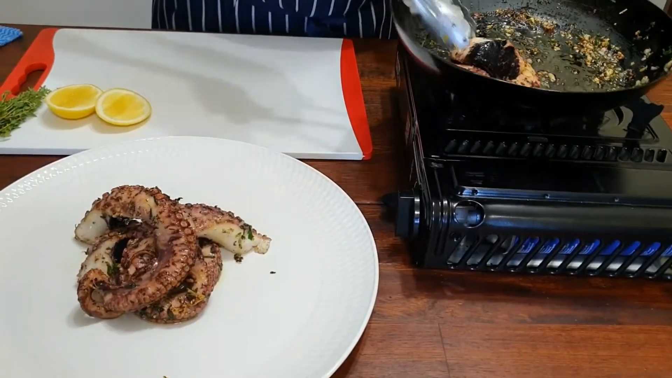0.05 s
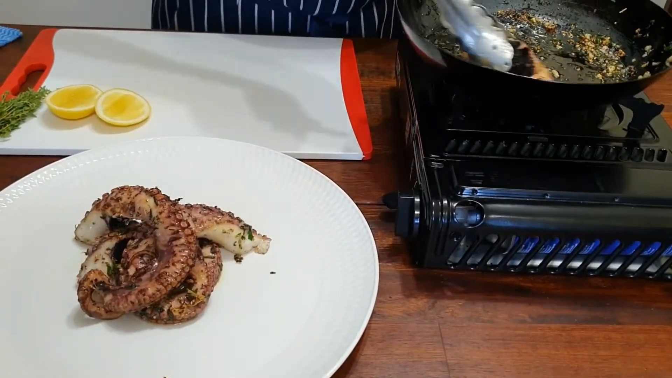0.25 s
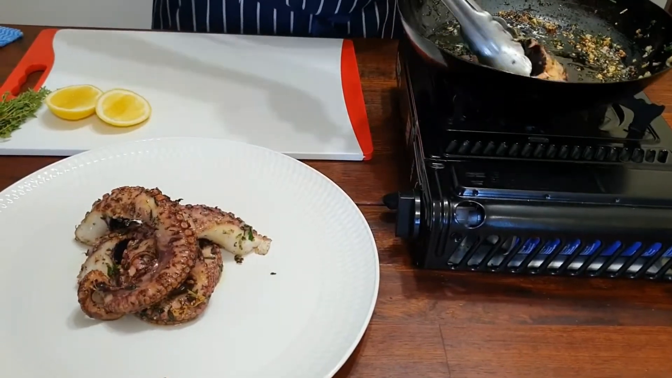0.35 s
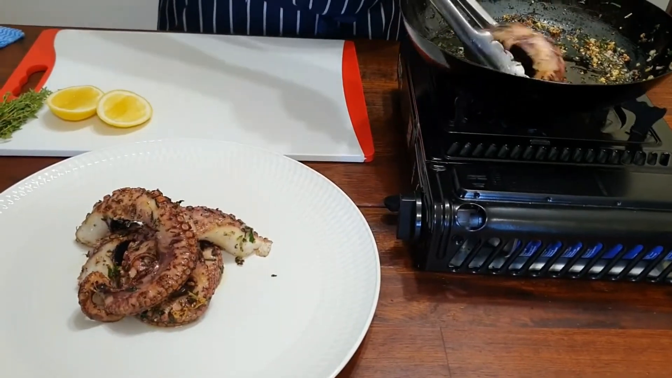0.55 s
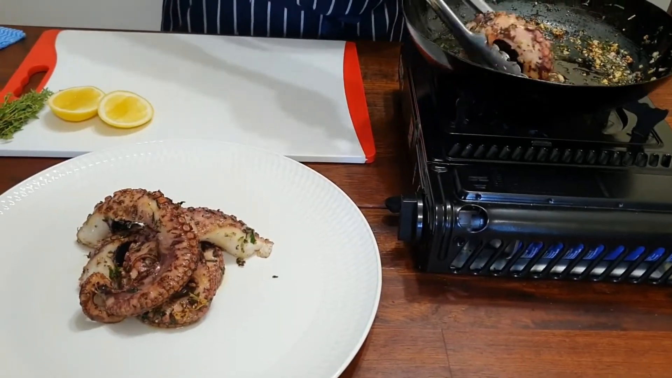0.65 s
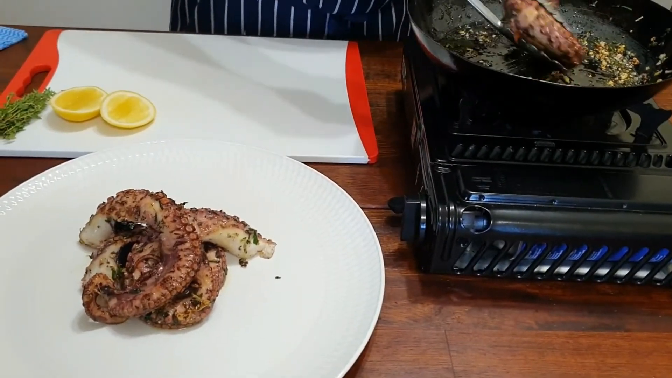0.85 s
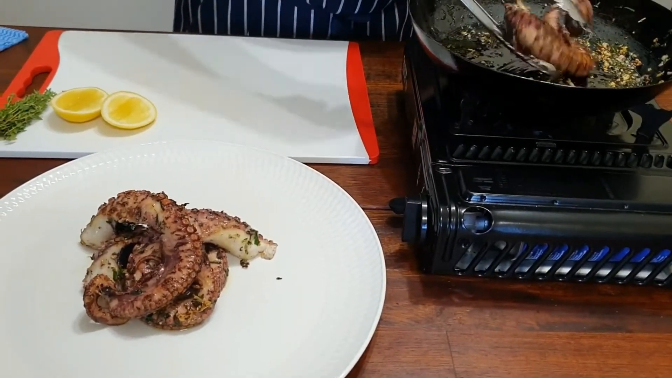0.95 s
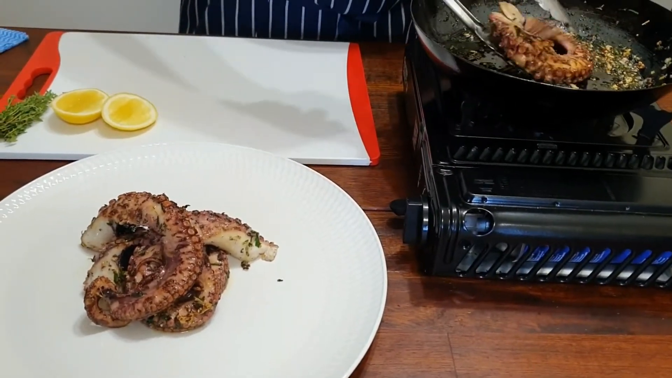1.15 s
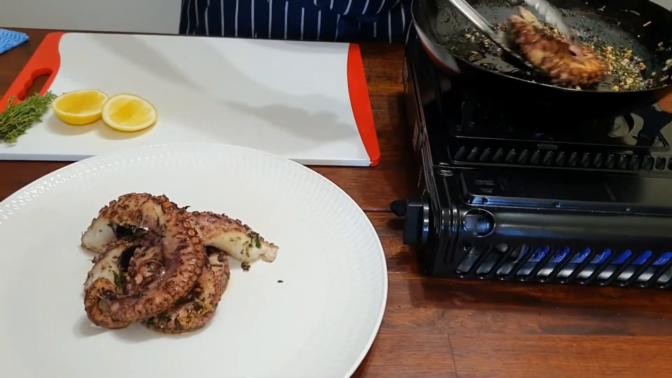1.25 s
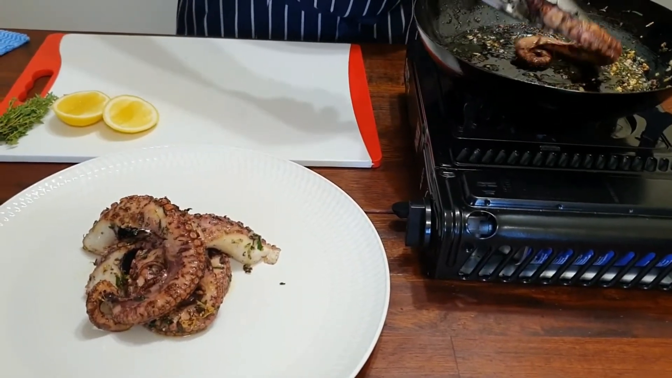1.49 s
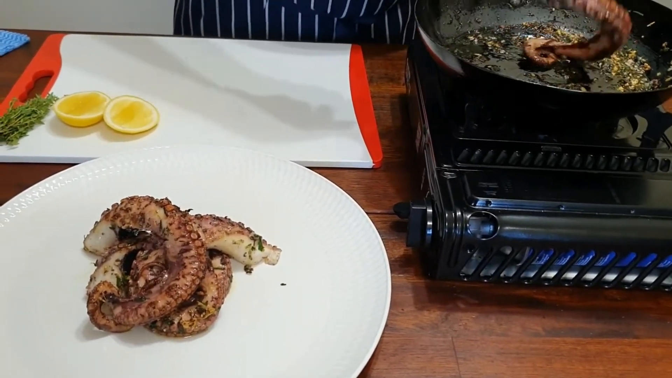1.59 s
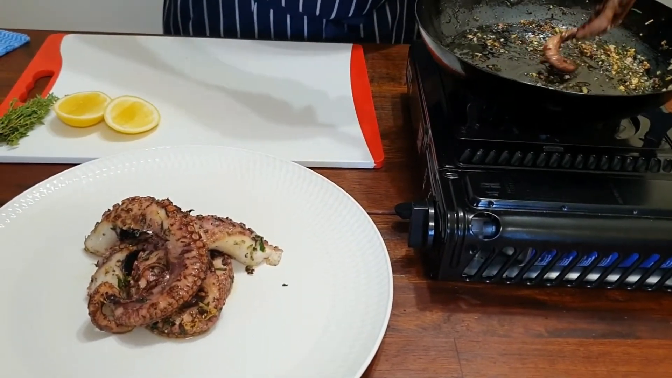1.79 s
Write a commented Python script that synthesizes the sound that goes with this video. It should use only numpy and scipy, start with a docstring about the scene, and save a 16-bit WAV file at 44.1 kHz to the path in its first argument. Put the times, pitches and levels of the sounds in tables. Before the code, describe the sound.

Metal tongs strike a steel frying pan with a loud, quick double clank and low thump, then a gritty scrape and a few light taps, close to the camera in a small hard kitchen with faint hum.

```python
"""Metal tongs strike and slide in a steel frying pan in a small hard kitchen, near a camera.
Over quiet room noise with a low wavering hum, a loud double clank comes at 0.22 and 0.25 s with a low thump;
a gritty slide and a few light touches follow. The pan's lowest tone swells and sinks beneath them.
Strikes are dying modes plus coloured noise, the slide random clicks, the low tones sines, the room shaped noise."""
import sys
import numpy as np
from scipy import signal
from scipy.fft import rfft, irfft
from scipy.io import wavfile
from scipy.ndimage import uniform_filter1d

SR = 44100
rng = np.random.default_rng(int(sys.argv[2]) if len(sys.argv) > 2 else 0)


def invert_db(level):
    """Linear amplitude ratio for a level in decibels (20 dB per decade), elementwise."""
    return 10 ** (np.asarray(level, dtype=float) / 20)


def to_wav(sig):
    """Store sig (one row per channel, or 1-D mono) as 16-bit WAV at the path in sys.argv[1].

    Samples outside -1..1 are clipped; the rate is SR.
    """
    pcm = np.clip(np.atleast_2d(sig), -1, 1) * 32767
    pcm = np.round(pcm).astype(np.int16)
    wavfile.write(sys.argv[1], SR, pcm.T)  # frames by channels


N = 79380

# Modes of the pan. Each row: frequency in Hz, relative level in dB, t60 in seconds (the slide shortens it).
PAN_MODES = [(290, -17, .1), (538, -4, .5), (615, -10, .6), (672, -9, .3), (820, -5, .45), (935, -4, .3),
             (1012, 0, .6), (1140, -7, .45), (1180, -7, .5), (1224, -6, .5), (1290, -6, .4), (1402, -6, .4),
             (1530, -5, .3), (1690, -7, .3), (1770, -5, .3), (1990, -9, .25), (2286, -4, .3),
             (2490, -6, .3), (2570, -10, .3), (2832, -7, .3), (3280, -10, .25)]
MONO_HZ = 400  # well below this both ports hear the same


def evened(x):
    """Scales to rms 1."""
    return x / np.sqrt(np.mean(x ** 2) + 1e-20)


def read(points, hz):
    """Reads a table on a log-frequency axis."""
    f, value = np.transpose(points)
    return np.interp(np.log(hz + 1), np.log(f + 1), value)


def hump_db(hz, centre_hz, octaves):
    """A bell on the octave axis, 6 dB down at the given octaves (at least 0.08) to either side."""
    return -6 * (np.log2((hz + 1) / centre_hz) / max(octaves, .08)) ** 2


def coloured(x, db):
    """Filters by a dB value for each FFT bin."""
    return irfft(rfft(x) * invert_db(db), x.shape[-1])


def add(mix, s, sound):
    """Mixes a sound in at s seconds, which may lie before zero."""
    at = round(s * SR)
    sound = sound[:, max(-at, 0):]
    part = mix[:, max(at, 0):][:, :sound.shape[1]]
    part += sound[:, :part.shape[1]]


def air():
    """Quiet room noise with its low wavering hum, from random short-time spectra."""
    # Each row: frequency in Hz, relative level in dB per Hz.
    spectrum = [(12, -42), (20, -14.5), (102, 0), (178, -28), (210, -13.5), (539, -17.5), (637, -17),
                (773, -20.5), (840, -17), (5840, -33), (12000, -48.5), (15000, -44)]
    # Each row: frequency in Hz, left-right likeness from -1 to 1.
    likeness = [(60, 0.89), (180, 1), (540, 0.21), (1620, 0.02), (4840, -0.27), (14500, 0.3)]
    level_db, patchy_db = -56.5, 1.2
    frames, hz = N // 512 + 5, np.fft.rfftfreq(2048, 1 / SR)
    a, b, c, d, patches = rng.standard_normal((frames, 1025, 5)).T
    patches = uniform_filter1d(patches, 20, 0)
    patches = evened(uniform_filter1d(patches, 6, 1))
    same = np.clip(read(likeness, hz), -1, 1)[:, None]
    left = a + 1j * b
    right = same * left + np.sqrt(1 - same ** 2) * (c + 1j * d)
    z = np.array([left, right]) * invert_db(read(spectrum, hz)[:, None] + patchy_db * patches)
    noise = signal.istft(z, nperseg=2048, noverlap=1536)[1][:, :N]
    return invert_db(level_db) * evened(noise)


def kitchen(x):
    """Sparse taps of random sign, each band dying at its own speed; the bass is alike at both ports."""
    # Each row: frequency in Hz, t60 in seconds.
    decay = [(100, 0.58), (400, 0.51), (1200, 0.25), (3500, 0.37), (8000, 0.4), (14000, 0.13)]
    taps = np.zeros((2, SR))
    at = np.arange(200, SR - 20, 20) + rng.integers(0, 20, (2, (SR - 201) // 20))
    np.put_along_axis(taps, at, rng.choice([-1., 1.], at.shape), 1)
    hz, t, z = signal.stft(taps, SR, nperseg=512)
    apart = (hz ** 2 / (hz ** 2 + MONO_HZ ** 2))[:, None]
    right = np.sqrt(1 - apart ** 2) * z[0] + apart * z[1]
    t60_s = np.maximum(read(decay, hz), .05)[:, None]
    z = np.array([z[0], right]) * invert_db(-60 * t / t60_s)
    tail = signal.istft(z, SR, nperseg=512)[1]
    tail = tail / np.linalg.norm(tail, axis=1, keepdims=True)
    return signal.fftconvolve(x[None], tail, axes=1)


def drone():
    """The pan's lowest tone, a sine that swells and sinks, slightly unsteady in pitch."""
    # Each row: time in seconds, level in dB before the trim.
    swell = [(0.0, -55), (0.124, -77), (0.175, -68.5), (0.236, -33), (0.28, -27), (0.35, -46),
             (0.409, -34.5), (0.437, -49.5), (0.466, -37), (0.506, -55), (0.52, -49.5), (0.579, -70),
             (0.666, -40.5), (0.69, -43), (0.746, -64), (0.832, -60), (0.886, -78), (0.99, -72),
             (1.02, -53.5), (1.06, -56.5), (1.108, -51.5), (1.178, -61.5), (1.308, -73), (1.382, -52.5),
             (1.554, -84), (1.654, -69), (1.8, -74)]
    pitch_hz, waver_rms_hz, trim_db = 383.7, 6.79, -4.5
    s, db = np.transpose(swell)
    waver = uniform_filter1d(rng.standard_normal(N), 1500)
    waver = evened(uniform_filter1d(waver, 1500))
    turns = np.cumsum(pitch_hz + waver_rms_hz * waver) / SR
    rms_db = np.interp(np.arange(N) / SR, s, db) + trim_db
    return np.sqrt(2) * invert_db(rms_db) * np.sin(2 * np.pi * turns)


def thump():
    """A low push as the pan knocks on the stove: a dying sine."""
    start_s, peak_db, pitch_hz, t60_s = .257, -40, 85, .3
    t = np.maximum(np.arange(N) / SR - start_s, 0)
    return invert_db(peak_db - 60 * t / t60_s) * np.sin(2 * np.pi * pitch_hz * t)


def ringing(modes, weights_db, choke_s):
    """Dying sines, cut short after choke_s; above the bass each mode has its own phase gap between the ports."""
    choked_t60_s, rise_cycles, spread_rad = .03, 3, 1.7
    hz, db, t60 = np.transpose(modes)[:, :, None]
    t = np.arange(SR // 2) / SR
    gap = rng.uniform(-1.6, 1, (len(modes), 1))
    gap_rad = spread_rad * gap * np.tanh(hz / (2 * MONO_HZ)) ** 2
    own_decay_db = 60 * t / np.maximum(t60, .02)
    choke_db = 60 * np.maximum(t - choke_s, 0) / choked_t60_s
    size = invert_db(db + weights_db[:, None] - own_decay_db - choke_db)
    size = size * np.minimum(t * hz / rise_cycles, 1)
    return np.array([(size * np.sin(2 * np.pi * hz * t + side * gap_rad)).sum(0) for side in (-.5, .5)])


def slide():
    """Gritty clicks under the stroke, partly raw and partly ringing the pan modes near the contact's colour."""
    # Each row: time in seconds, raw grit level in dB, ringing level in dB, centre of the ringing in Hz.
    stroke = [(0, -69, -97, 900), (.12, -61.5, -60.5, 930), (.19, -55.5, -64, 920),
              (0.298, -38.5, -46, 1100), (.43, -46, -46.5, 1100), (0.476, -47.5, -47, 1070),
              (0.529, -56.5, -58, 1180), (0.584, -49, -45, 1147), (0.636, -68, -59, 1210),
              (.67, -60, -68, 1050), (.72, -63, -95, 1460), (.76, -73, -106, 1200), (1.0, -74.5, -71, 1110),
              (1.06, -67, -108, 1000), (1.18, -93, -111.5, 1200), (1.3, -100, -82, 1330),
              (1.388, -103, -57, 1310), (1.45, -93, -74, 1260), (1.55, -105, -71.5, 1290),
              (1.8, -112, -75.5, 1290)]
    # Each row: frequency in Hz, relative level of the raw grit in dB per Hz.
    grit_colour = [(88, -67), (150, -74), (278, -75), (378, -7), (756, -2.5), (1010, -0.5), (1320, -0.5),
                   (2100, -6), (2520, -6), (3000, -12), (3450, -9.5), (4100, -23), (5000, -17), (5800, -19),
                   (6350, -19), (6900, -20.5), (7450, -18.5), (8300, -27), (14000, -30)]
    clicks_per_s, grit_db, octaves, t60_factor = 2500, 2.5, .22, .28
    s, raw_db, rung_db, centre_hz = np.transpose(stroke)
    t, hz = np.arange(N) / SR, np.fft.rfftfreq(N, 1 / SR)
    grit = invert_db(grit_db * np.minimum(rng.exponential(1, N), 4)) * rng.choice([-1., 1.], N)
    grit = grit * (rng.random(N) < clicks_per_s / SR)
    raw = evened(coloured(grit, read(grit_colour, hz)))
    out = invert_db(np.interp(t, s, raw_db)) * raw * np.ones((2, 1))
    for f, db, t60 in PAN_MODES:
        body = ringing([(f, 0, t60_factor * t60)], np.zeros(1), 1)
        rung = evened(signal.fftconvolve(grit[None], body, axes=1)[:, :N])
        level_db = np.interp(t, s, rung_db + db + hump_db(f, centre_hz, octaves))
        out += invert_db(level_db) * rung
    return out


def blow(modes, s, ring_db, clack_db, centre_hz, octaves, choke_s):
    """A contact and its small bounces ring the object and spit a coloured clack with a sharp first tick."""
    bounce, bounces_per_s, bounce_decay_s = .2, 260, 0.005
    clack_t60_s, tick_db, tick_t60_s, rise_s = 0.061, 6.5, 0.016, 0.00022
    port_noise = 0.67  # noise of each port's own, against 1 shared
    t = np.arange(2048) / SR
    draw = rng.random((2, 2048))
    chatter = bounce * (draw[0] < bounces_per_s / SR) * draw[1] * np.exp(-t / bounce_decay_s)
    chatter[0] = 1
    chatter = chatter / np.linalg.norm(chatter)
    weights_db = hump_db(np.transpose(modes)[0], centre_hz, octaves)
    ring = invert_db(ring_db) * ringing(modes, weights_db, choke_s)
    ring = signal.fftconvolve(ring, chatter[None], axes=1)

    t = np.arange(8192) / SR
    noise = rng.standard_normal((3, 8192))
    colour_db = hump_db(np.fft.rfftfreq(8192, 1 / SR), centre_hz, octaves)
    hiss = evened(coloured(noise[0] + port_noise * noise[1:], colour_db))
    decay = invert_db(-60 * t / clack_t60_s) + invert_db(tick_db - 60 * t / tick_t60_s)
    clack = hiss * invert_db(clack_db) * decay * np.minimum(t / rise_s, 1)
    return s, ring, clack


def scene():
    """Metal sounds direct and through the kitchen, over the low tones and room noise."""
    # Modes of the tongs. Each row: frequency in Hz, relative level in dB, t60 in seconds.
    tongs_modes = [(1487, -4, .2), (1822, 1, .18), (2081, -7, .2), (2450, -3, .15), (2927, -8, .2),
                   (3325, -7, .2), (3798, -11, .15), (5537, -4, .5), (5826, -13, .15), (6196, -14, .1),
                   (7185, -15, .07), (7490, -14, .07), (7850, -17, .07)]
    # The tongs clink. Each row: start in seconds, ring level in dB, clack level in dB,
    # centre of the colour in Hz, its half-width in octaves, seconds until the grip chokes the ring.
    clinks = [(.217, -27, -30.5, 2930, 1.96, 0.026), (.218, -27.5, -60, 5860, 0.14, 0.053),
              (0.6142, -42, -48.5, 6500, 1.4, 0.006), (0.62, -38, -67, 5600, 0.1, 0.012),
              (0.704, -52.5, -59, 6000, 0.59, 0.01), (1.07, -61, -59, 5950, 0.44, 0.0086),
              (1.3542, -56, -53.5, 7400, 0.51, .008), (1.461, -91, -73, 9300, 1.3, 0.0088)]
    # The pan is struck. Each row: start in seconds, ring level in dB, clack level in dB,
    # centre of the colour in Hz, its half-width in octaves, seconds until food and stove choke the ring.
    knocks = [(-.02, -48, -37.5, 894, 1.13, 0.035), (0.218, -15, -43, 292, 0.52, 0.012),
              (.220, -27.5, -31.5, 1600, 0.57, 0.023), (0.2528, -25, -24, 1880, 0.66, .2),
              (.2540, -12, -25.5, 943, 0.69, 0.0045), (.291, -31, -34, 1040, 0.2, 0.046),
              (0.614, -38, -43, 1980, 0.24, 0.0034), (0.619, -35, -49.5, 2660, 0.14, 0.014),
              (0.619, -33, -42, 1145, 0.13, 0.02), (1.07, -38.5, -50, 1686, 0.13, 0.035),
              (1.073, -47.5, -46, 1590, 0.65, 0.047), (1.074, -44.5, -55, 3320, 0.14, 0.022),
              (1.078, -52, -49, 690, 0.27, 0.041), (1.332, -40.5, -57, 1256, 0.065, 0.004),
              (1.326, -52, -54.5, 764, .2, .004), (1.359, -71, -58, 3120, 0.8, 0.042),
              (1.358, -40, -54, 680, 0.23, 0.035), (1.352, -59, -51, 1300, 0.65, 0.013),
              (1.364, -44.5, -63, 1206, .12, 0.04), (1.378, -51, -49.5, 1280, 0.13, 0.023),
              (1.413, -56, -57, 1254, 0.054, 0.028)]
    kitchen_db, ring_send_db, left_db, lag_s = 1, -9, -2.5, .00018
    lead, lag = SR // 10, round(lag_s * SR)  # the lead holds sounds that start before zero
    rings, metal = np.zeros((2, 2, N + lead))
    for modes, rows in ((tongs_modes, clinks), (PAN_MODES, knocks)):
        for row in rows:
            s, ring, clack = blow(modes, *row)
            add(rings, s + lead / SR, ring)
            add(metal, s + lead / SR, clack)
    metal[:, lead:] += slide()
    send = (metal + invert_db(ring_send_db) * rings).mean(0)
    wet = invert_db(kitchen_db) * kitchen(send)[:, lead:lead + N]
    left = invert_db(left_db) * (metal[0, lead - lag:][:N] + rings[0, lead:])  # the rings do not lag
    right = (metal + rings)[1, lead:]
    low = drone() + thump()
    return np.array([left, right]) + wet + np.array([np.roll(low, lag), low]) + air()


def top_cut(x):
    """Nothing passes above the cut-off."""
    return signal.sosfilt(signal.butter(12, 15110, fs=SR, output="sos"), x)


def record(dry):
    """The camera's band limits: a steep low-pass and a gentle high-pass."""
    edge_hz, low_cut_hz = 14800, 55
    cut = signal.oaconvolve(dry, signal.firwin(255, edge_hz, fs=SR)[None], "same")
    cut = signal.sosfilt(signal.butter(1, low_cut_hz, "high", fs=SR, output="sos"), cut)
    return top_cut(cut)


dry = scene()
out = record(dry)
to_wav(out)
```